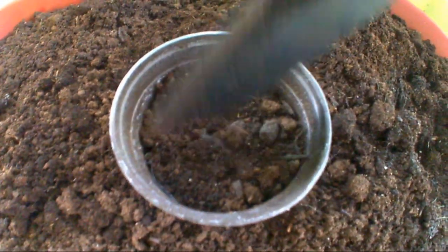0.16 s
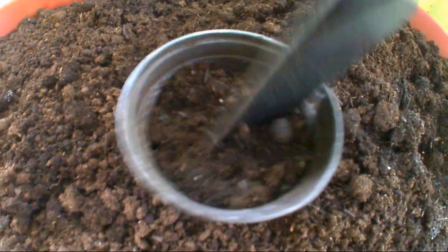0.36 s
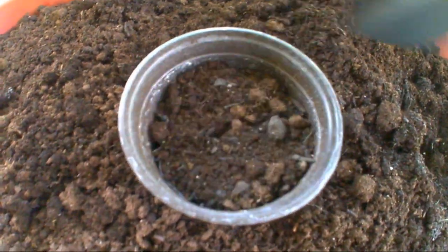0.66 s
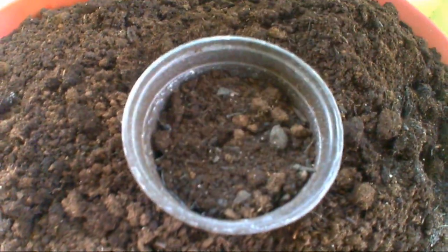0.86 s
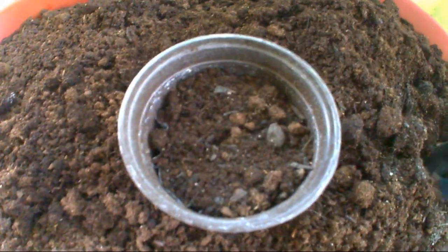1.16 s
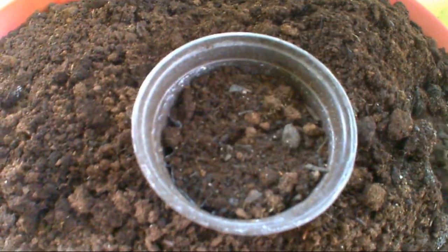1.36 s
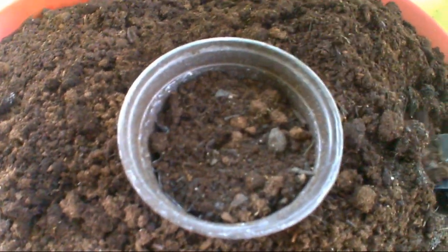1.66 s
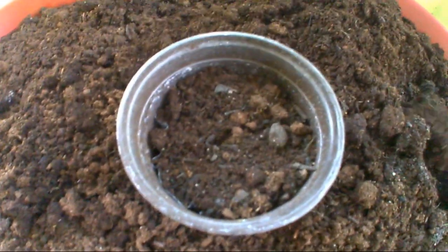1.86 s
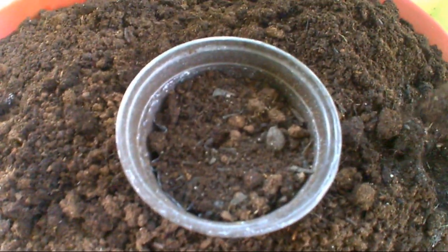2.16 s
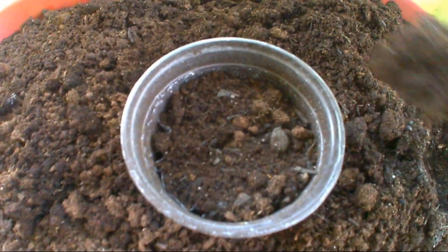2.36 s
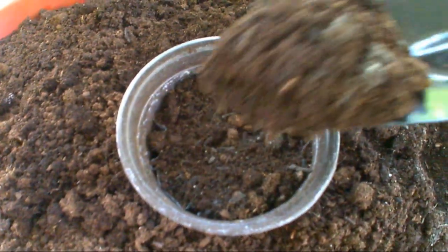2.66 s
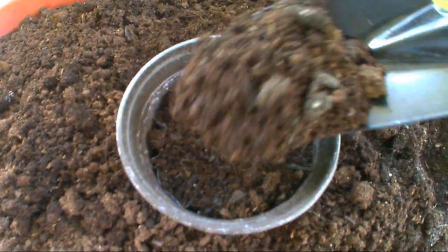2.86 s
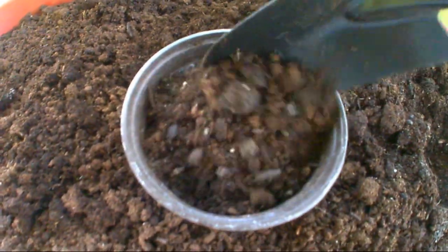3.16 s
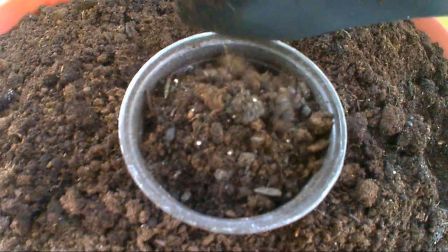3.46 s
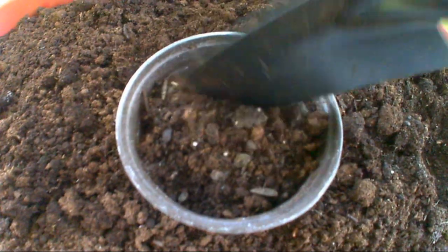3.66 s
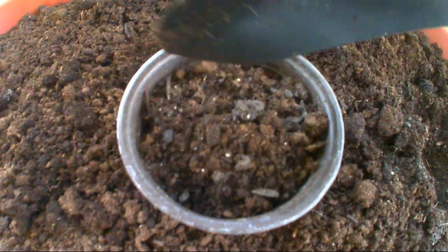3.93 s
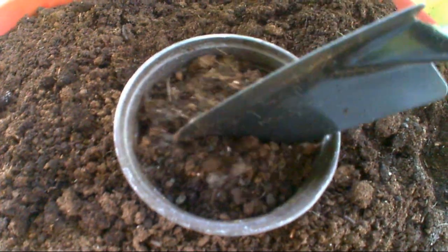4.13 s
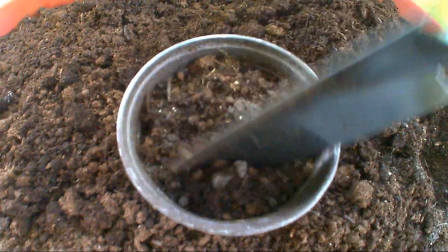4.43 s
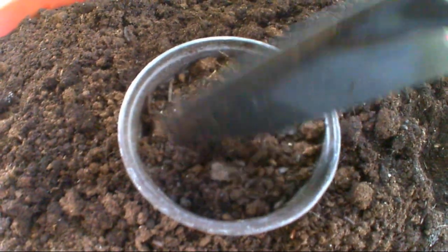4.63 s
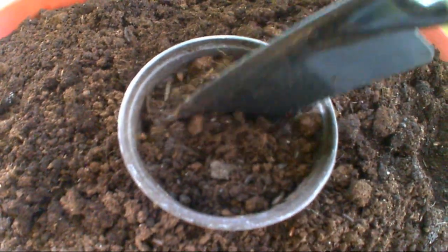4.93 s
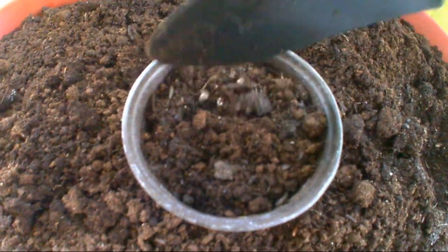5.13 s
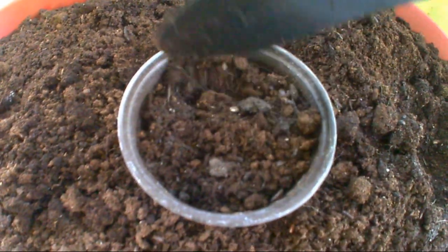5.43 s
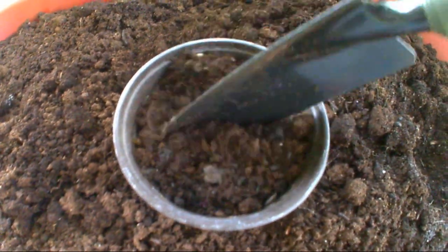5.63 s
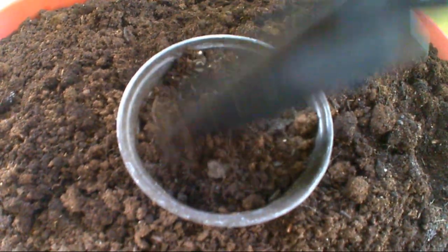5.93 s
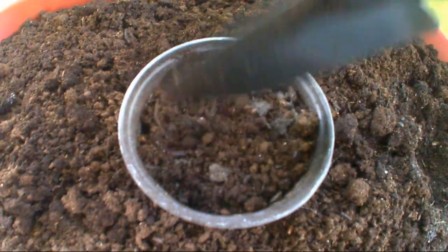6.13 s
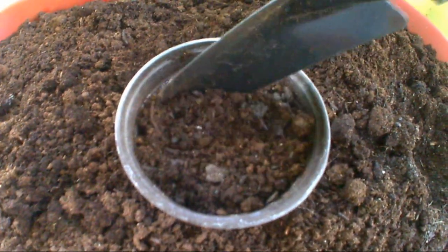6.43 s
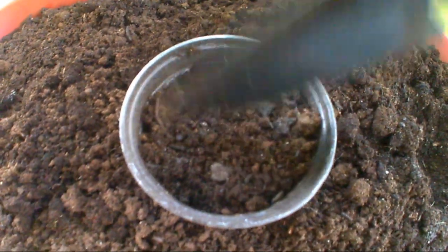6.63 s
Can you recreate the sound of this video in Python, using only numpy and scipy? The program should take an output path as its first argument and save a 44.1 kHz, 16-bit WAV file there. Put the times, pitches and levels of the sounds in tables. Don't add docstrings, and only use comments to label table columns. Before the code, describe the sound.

Close, sparse scoop work in potting soil: one sharp early clack, small grit ticks and scrapes, a late firm knock, steady dull hiss beneath.

```python
import sys
import numpy as np
from scipy import signal
from scipy.fft import rfft, irfft, next_fast_len
from scipy.io import wavfile
from scipy.ndimage import uniform_filter1d, map_coordinates

SR = 44100
rng = np.random.default_rng(int(sys.argv[2]) if len(sys.argv) > 2 else 0)


def field_ratio(decibels):
    return 10 ** (np.asarray(decibels, dtype=float) / 20)


def bounce(signal):
    frames = np.transpose(np.atleast_2d(signal))
    limited = np.clip(frames, -1, 1)
    pcm = np.round(limited * 32767).astype(np.int16)
    wavfile.write(sys.argv[1], SR, pcm)


N = 299439


def unit(x):
    return x / np.sqrt(np.mean(x ** 2) + 1e-20)


def along(points, hz):
    f, value = np.transpose(points)
    return np.interp(np.log(hz + 1), np.log(f + 1), value)


def filtered(x, response):
    m = next_fast_len(N + SR // 2)
    spectrum = rfft(x, m) * response(np.fft.rfftfreq(m, 1 / SR))
    return irfft(spectrum, m)[..., :N]


def struck(force, modes):
    def resonances(f):
        total = 0
        for k, (centre, width, db) in enumerate(modes):
            total = total + (-1) ** k * field_ratio(db) * 1j * f * width / (centre ** 2 - f * f + 1j * f * width)
        return total

    blow = np.arange(N) == 0
    rung, blow_rung = filtered(np.array([force, blow]), resonances)
    return rung / np.abs(blow_rung).max()


def rush(spectrum, patchy_db):
    z = signal.stft(rng.standard_normal(N), nperseg=512)[2]
    patches = uniform_filter1d(rng.standard_normal(z.shape), 6, 0)
    patches = uniform_filter1d(patches, 12, 1)
    noise = signal.istft(z * field_ratio(patchy_db * unit(patches)), nperseg=512)[1][:N]
    return unit(filtered(noise, lambda hz: field_ratio(along(spectrum, hz))))


# f/Hz, width/Hz, level/dB [rms]
MOTOR_TONES = [(247, 1.3, -68.5), (494.2, 2.5, -74.5), (988, 4, -84)]


def motor_hum():
    t, hum = np.arange(N) / SR, 0
    for hz, width, db in MOTOR_TONES:
        drift = unit(filtered(rng.standard_normal((2, N)), lambda f: 1 / (1 + (f / width) ** 4)))
        carrier = (1 + 0.21 * drift[0]) * np.sin(2 * np.pi * hz * t)
        sideband = 0.59 * drift[1] * np.cos(2 * np.pi * hz * t)
        hum = hum + field_ratio(db) * unit(carrier + sideband)
    return hum


# f/Hz, level/dB [per Hz]
AIR_SPECTRUM = [(60, -29), (100, -3.5), (150, -5), (215, -1), (300, -6), (420, -9), (610, -7.5),
                (1100, -13), (1600, -16), (2300, -21), (4300, -24), (4950, -27.5), (5500, -23.5),
                (6500, -37.5), (7400, -49), (9000, -78)]
# f/Hz, level/dB [per Hz]
RUMBLE_SPECTRUM = [(4, -23.5), (10, -6.5), (30, 0.5), (60, -1), (95, -1), (140, -26), (220, -45)]
AIR_DB, RUMBLE_DB, RUMBLE_SWELL_DB = -59.5, -60.5, -1
LULL_S, LULL_LENGTH_S, LULL_DB = 4.34, 0.17, -13


def background():
    t = np.arange(N) / SR
    swell = unit(map_coordinates(rng.standard_normal(12), [t]))
    lull = np.exp(-((t - LULL_S) / LULL_LENGTH_S) ** 2)
    rumble_db = RUMBLE_DB + RUMBLE_SWELL_DB * swell + LULL_DB * lull
    air = field_ratio(AIR_DB) * rush(AIR_SPECTRUM, patchy_db=0.67)
    rumble = field_ratio(rumble_db) * rush(RUMBLE_SPECTRUM, patchy_db=0.0)
    return air + rumble + motor_hum()


WRITE_SPELLS = [
    (2.3, 64),
    (66.25, 120),
    (138.3, 150),
    (151.7, 198),
]
FRAME_S, FIRST_FRAME_S, WRITE_EVERY_FRAMES = .03425, .035, 2.79
SAG_DB, SAG_SPREAD_DB, SAG_S = -55, 5, .0272


def supply_flutter():
    clock = np.arange(N) / SR - FIRST_FRAME_S + FRAME_S + .007
    frame, since = (clock // FRAME_S).astype(int), clock % FRAME_S
    lift, length = rng.standard_normal(size=(N // 1000, 2))[frame].T
    volts = field_ratio(-60.0 + 4.07 * lift) * (since < .0115 + .0015 * length)
    spells = [np.arange(first, last, WRITE_EVERY_FRAMES) for first, last in WRITE_SPELLS]
    writes = np.concatenate(spells).astype(int)
    depth = np.zeros(N // 1000)
    depth[writes + 1] = field_ratio(SAG_DB + SAG_SPREAD_DB * rng.standard_normal(len(writes)))
    volts -= depth[frame] * (since > FRAME_S - SAG_S)
    return filtered(volts, lambda hz: 1j * hz / (7 + 1j * hz) / (1 + 1j * hz / 500) ** 2)


def converter_whistle():
    return field_ratio(-96) * np.sqrt(2) * np.sin(np.pi / 2 * np.arange(N) + np.pi / 4)


def pulse(t, hz, ms):
    return np.exp(-(1000 * t / ms - 1) ** 2) * np.sin(2 * np.pi * hz * t)


# f/Hz, level/dB
CHIRP_OVERTONES = [(5300, -8), (6700, -5)]
CHIRP_ATTACK_S, CHIRP_T60_S = .0004, .009


def chirp(t, hz):
    modes = np.sin(2 * np.pi * hz * t)
    for high_hz, db in CHIRP_OVERTONES:
        modes = modes + field_ratio(db) * np.sin(2 * np.pi * high_hz * t)
    return (1 - np.exp(-t / CHIRP_ATTACK_S)) * field_ratio(-60 * t / CHIRP_T60_S) * modes


# f/Hz, width/Hz, level/dB
POT_WALL = [(1216, 37, 9), (1550, 344, 4.5), (1795, 150, 5.5), (2280, 790, -5)]
# f/Hz, width/Hz, level/dB
STONE_ON_BLADE = [(3060, 630, -10), (3636, 170, 4.5), (4170, 710, 3.5), (4920, 1500, -1.5),
                  (6180, 720, -7.5)]
# f/Hz, width/Hz, level/dB
BLADE_RING = [(2690, 19, 0)]
# f/Hz, width/Hz, level/dB
POT_CAVITY = [(427, 38, 7.5), (566, 130, -11.5), (880, 125, -0.5)]


def contact_sounds():
    force, knocks, t = np.zeros((4, N + SR)), np.zeros(N + SR), np.arange(SR // 20) / SR
    lead = 22
    rattle_db = np.array([[-16], [-11], [-20], [-20]])
    rattle_t60 = np.array([[.04], [.015], [.02], [.02]])
    blow = -field_ratio(np.array([-35, -19, -11.5, -7.5]))
    for s, db, hz, ms, grit_db, grit_hz, ring_db, thud_db in blade_knocks() + stone_ticks() + blade_flicks():
        start = round(s * SR)
        loosened = (rng.random(len(t)) < .08) * (np.arange(len(t)) > lead)
        rattle = rng.standard_normal((4, len(t))) * loosened
        rattle *= field_ratio(rattle_db - 60 * t / rattle_t60)
        rattle[:, lead] = blow
        force[:, start:start + len(t)] += field_ratio([[db - 4.5], [grit_db + 7], [ring_db], [thud_db]]) * rattle
        touch = field_ratio(db + 1.0) * pulse(t, hz, ms) + field_ratio(grit_db + 2.0) * chirp(t, grit_hz)
        knocks[start + lead:start + lead + len(t)] -= touch
    bodies = (POT_WALL, STONE_ON_BLADE, BLADE_RING, POT_CAVITY)
    wall, grit, blade, cavity = (struck(f[:N], modes) for f, modes in zip(force, bodies))
    soft = filtered(wall + cavity, lambda f: 1 / (1 + 1j * f / 2200) ** 2)
    hard = filtered(grit, lambda f: (1j * f / (2600 + 1j * f)) ** 2 / (1 + 1j * f / 5200) ** 2)
    return knocks[:N] + soft + hard + blade


# t/s, knock level/dB, knock f/Hz, caught grit level/dB, contact/ms
BLADE_KNOCKS = [(0.4283, -45, 1840, -50, 0.67), (0.4317, -56, 1800, -58, 0.65), (.438, -50, 1400, -71, .9),
                (0.4452, -24, 1650, -39, 0.69), (.449, -45, 1350, -58, 0.56), (0.46, -52, 1600, -67, 0.76),
                (0.463, -45, 1390, -66, 0.7), (0.476, -51, 1500, -70, 0.9), (0.506, -51, 1550, -64, 0.58),
                (1.151, -50, 1750, -68, 0.46), (2.561, -48, 1580, -78, 0.87), (2.574, -55, 1480, -78, .8),
                (3.084, -51, 1300, -66, 0.71), (3.0866, -51, 1410, -54, 0.82),
                (3.1276, -54, 1700, -70, 0.67), (3.129, -50, 1950, -59, .7),
                (3.2154, -36.5, 1890, -42.5, 0.37), (3.242, -55, 1700, -66, 0.99),
                (3.2372, -52, 2500, -60, .5), (3.2478, -49, 1970, -58, 0.39),
                (3.2563, -57, 1800, -64, 0.99), (3.4226, -44, 1660, -72, 0.43),
                (3.426, -56, 1500, -75, 0.7), (3.7952, -48, 1180, -66, 0.58), (4.122, -53, 1400, -68, 0.89),
                (4.1733, -36.5, 1550, -68, 0.51), (4.495, -58, 1280, -72, 0.65),
                (4.568, -52, 1350, -68, 0.47), (4.883, -61, 1300, -68, 0.95),
                (4.8922, -55, 1600, -57, 0.74), (4.8965, -54, 1700, -66, 0.72), (4.9, -47, 1740, -66, 0.68),
                (4.904, -52, 1690, -66, .9), (5.637, -50, 1200, -66, 0.44), (5.651, -53, 1500, -65, 0.54),
                (6.7694, -27.5, 1550, -47, 0.6), (6.7704, -44, 1880, -61, 0.72)]
THUD_DB, RING_DB = -1, -20
FILLED_S, FILLED_THUD_DB = 3, -10.5
GRIT_HZ = 4250


def blade_knocks():
    contacts = []
    for s, db, hz, grit_db, ms in BLADE_KNOCKS:
        thud_db = db + THUD_DB + FILLED_THUD_DB * (s > FILLED_S)
        contacts.append((s, db, hz, ms, grit_db, GRIT_HZ, db + RING_DB, thud_db))
    return contacts


# t/s, level/dB
CRUSHED_CRUMBS = [
    (.4286, -66),
    (0.4456, -31.5),
    (0.4479, -51),
    (3.128, -59),
    (3.214, -60),
    (4.1737, -62),
    (4.889, -62),
    (6.77, -42.5),
]
CRACK_T60_S, CRACK_LOW_HZ = 0.022, 2590


def cracks():
    out, t = np.zeros(N + SR), np.arange(SR // 50) / SR
    for s, db in CRUSHED_CRUMBS:
        out[round(s * SR):][:len(t)] += field_ratio(db - 60 * t / CRACK_T60_S) * rng.standard_normal(len(t))
    return filtered(out[:N], lambda f: (1j * f / (CRACK_LOW_HZ + 1j * f)) ** 2 / (1 + (f / 7000) ** 12))


# t/s, length/s, dull crumb level/dB, fine grit level/dB
CRUMB_SLIDES = [(0.444, 0.076, -56, -58), (1.016, 0.086, -66.5, -83), (1.107, .01, -65.5, -80),
                (1.14, 0.035, -64.5, -75), (0.992, .01, -69, -83), (1.537, 0.049, -65, -67),
                (1.847, .06, -85, -74), (2.593, 0.044, -69, -87), (3.084, 0.019, -64.5, -67),
                (3.127, .04, -81, -81), (3.215, 0.0085, -61, -66), (3.236, 0.028, -64, -63),
                (3.4, .03, -78, -73), (3.533, 0.037, -69, -71), (3.751, .02, -66, -74),
                (3.798, 0.0089, -69, -72), (3.988, 0.054, -86, -72), (4.135, 0.025, -72, -73),
                (4.171, 0.009, -66, -67), (4.531, 0.026, -66.5, -72), (4.86, 0.024, -73, -83),
                (4.887, 0.024, -62, -65), (5.116, .01, -81, -71), (5.288, .01, -65, -68),
                (5.51, 0.065, -77, -71.5), (5.66, .01, -71, -69), (6.026, .05, -76, -73),
                (6.143, .05, -67, -76), (6.408, 0.059, -84, -70), (6.758, .005, -63, -74),
                (6.775, .012, -64, -65)]
RISE_DB_PER_S, THIN_DB_PER_S, STOP_DB_PER_S = 2198, 170, 443


def sliding():
    t, gain = np.arange(N) / SR, np.zeros((2, N))
    for s, length, dull_db, fine_db in CRUMB_SLIDES:
        near = slice(round((s - .1) * SR), round((s + .3) * SR))
        u = t[near] - s
        loss_db = RISE_DB_PER_S * (-u).clip(0)
        loss_db += THIN_DB_PER_S * u.clip(0, abs(length))
        loss_db += STOP_DB_PER_S * (u - length).clip(0)
        gain[:, near] += field_ratio([[dull_db], [fine_db]] - loss_db)
    return gain


def crumbs(per_second, spread_db):
    hits = rng.random(N) < per_second / SR
    return hits * rng.standard_normal(N) * field_ratio(spread_db * rng.exponential(size=N))


def trickle():
    dull, fine = sliding()
    wall = unit(struck(crumbs(per_second=6000, spread_db=.6), POT_WALL))
    grit = crumbs(per_second=8000, spread_db=.4)
    scratch = unit(struck(grit, STONE_ON_BLADE))
    scratch += field_ratio(-12.5) * unit(struck(grit, BLADE_RING))
    scratch += field_ratio(-5.5) * unit(struck(grit, [(2690, 640, 0)]))
    return dull * wall + fine * unit(scratch)


# t/s, level/dB, f/Hz, t60/s
SHORT_RINGS = [(1.079, -57, 1450, .08), (1.0, -55, 1800, .025), (1.141, -56, 1780, .04),
               (1.533, -56, 2440, .05), (1.553, -57, 2440, .04), (.452, -47, 2700, .02),
               (1.15, -45, 405, .06), (4.1735, -48, 724, 0.016), (6.77, -40, 680, .014),
               (3.219, -50, 560, .03), (0.4475, -46, 1000, 0.022), (.447, -50, 557, 0.058),
               (2.586, -54, 910, 0.07), (2.589, -53, 630, .05), (2.604, -56, 1020, .03),
               (3.2163, -43, 1650, .013), (3.2215, -52, 1250, .025), (4.175, -49, 560, .02),
               (3.102, -57, 1300, .03), (6.7735, -46, 1450, .02), (4.176, -53, 3660, 0.014),
               (6.7722, -39, 3680, 0.012)]


def pings():
    out, t = np.zeros(N + SR), np.arange(SR // 10) / SR
    for s, db, hz, t60 in SHORT_RINGS:
        envelope = field_ratio(db - 60 * t / t60) * (1 - np.exp(-t / 0.00079))
        out[round(s * SR):][:len(t)] += envelope * np.sin(2 * np.pi * hz * t)
    return out[:N]


# t/s, level/dB, f/Hz
SINGLE_STONES = [(.4685, -69, 4300), (.4565, -58, 4200), (.4855, -60, 4400), (.5165, -60, 3950),
                 (1.547, -54, 4340), (3.1258, -50, 4150), (3.2177, -56, 4420), (3.2315, -64, 4200),
                 (3.2445, -60, 4330), (3.264, -65, 4100), (3.154, -57, 4150), (3.4087, -51.5, 4030),
                 (3.413, -63, 3900), (3.512, -59, 4200), (3.534, -57, 4250), (3.548, -58, 4200),
                 (3.7522, -62, 4240), (3.972, -45.5, 4200), (4.0013, -55.5, 4220), (5.136, -61, 4200),
                 (5.282, -58, 4170), (5.493, -58, 4600), (5.5147, -63, 4600), (5.522, -63, 5100),
                 (5.5344, -56, 4100), (6.034, -60, 4150), (6.4, -60, 4180)]
STONE_KNOCK_DB, STONE_RING_DB = -14, -31
STONE_HZ, STONE_MS = 1350, 0.84


def stone_ticks():
    contacts = []
    for s, db, hz in SINGLE_STONES:
        knock_db = db + STONE_KNOCK_DB
        contacts.append((s, knock_db, STONE_HZ, STONE_MS, db, hz, db + STONE_RING_DB, knock_db + THUD_DB))
    return contacts


# t/s, ring level/dB
BLADE_FLICKS = [
    (1.038, -52),
    (1.15, -63),
    (5.637, -55),
    (6.1445, -51),
    (6.164, -58),
]
FLICK_GRIT_DB = -16


def blade_flicks():
    contacts = []
    for s, db in BLADE_FLICKS:
        grit_db = db + FLICK_GRIT_DB
        contacts.append((s, grit_db, STONE_HZ, STONE_MS, grit_db, GRIT_HZ, db, db + THUD_DB))
    return contacts


def scene():
    trowel = contact_sounds() + cracks() + pings()
    return (background() + trickle() + trowel)[None]


def roll_off(x):
    return signal.sosfilt(signal.butter(12, 11400, fs=SR, output="sos"), x)


NOTCH_HZ, NOTCH_WIDTH_HZ, NOTCH_DEPTH = 5600, 380, 0.68
OFFSET = .041


def record(dry):
    def microphone(hz):
        notch = 1 - NOTCH_DEPTH * np.exp(-((hz - NOTCH_HZ) / NOTCH_WIDTH_HZ) ** 2)
        return notch / (1 + (hz / 7200) ** 18)

    dull = filtered(dry, microphone)
    return roll_off(dull + supply_flutter() + converter_whistle() + OFFSET)


dry = scene()
out = record(dry)
bounce(out)
```